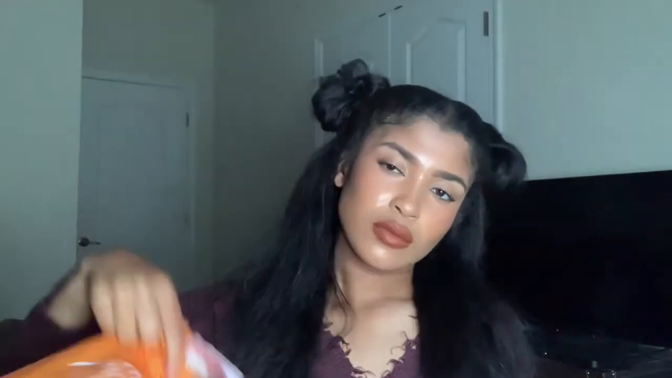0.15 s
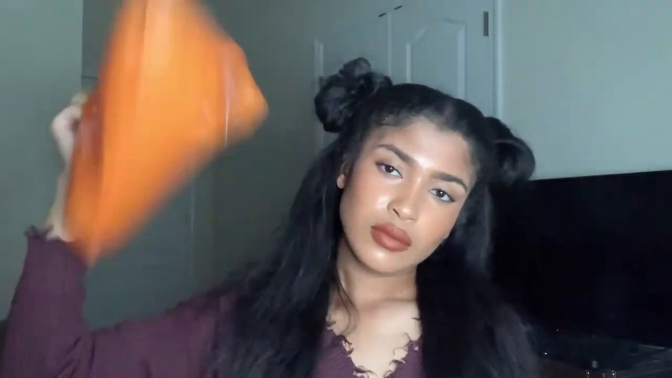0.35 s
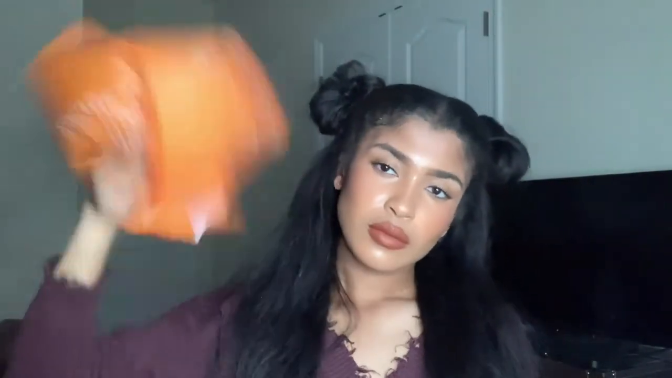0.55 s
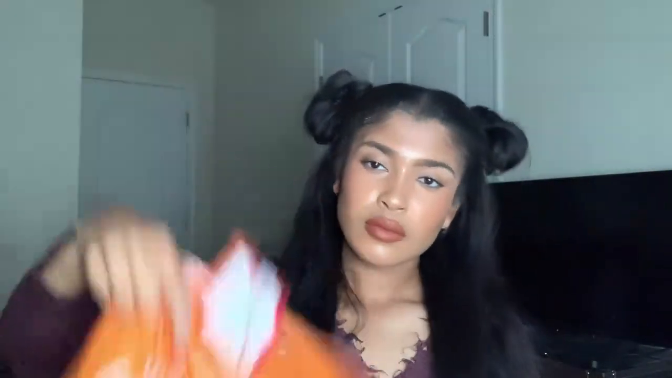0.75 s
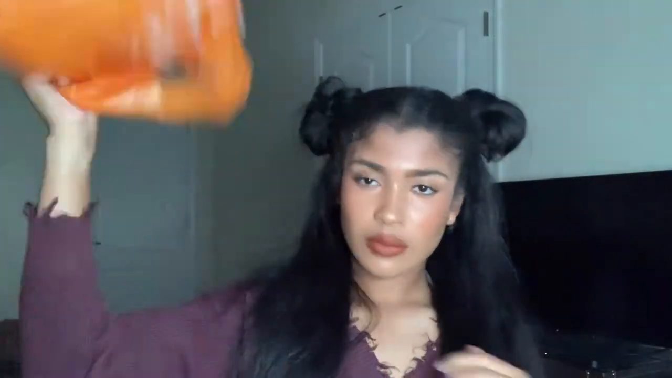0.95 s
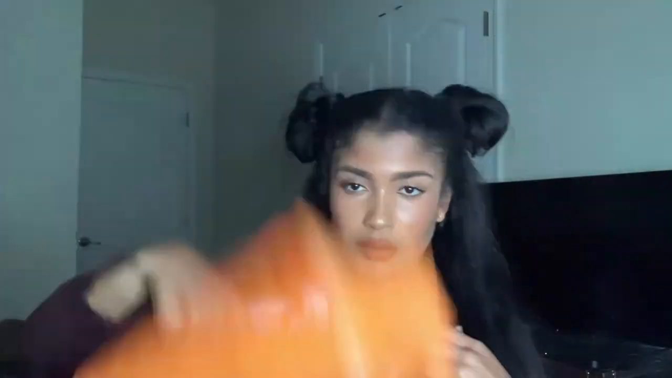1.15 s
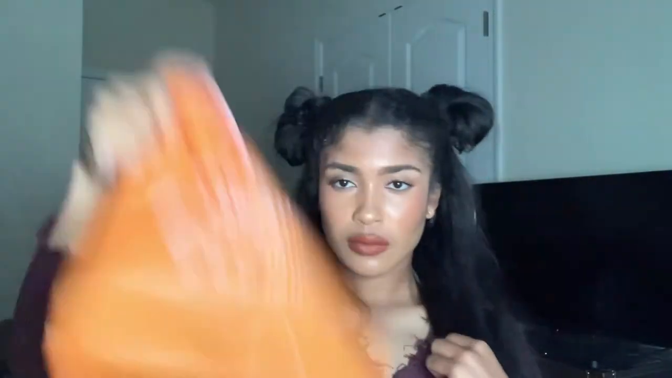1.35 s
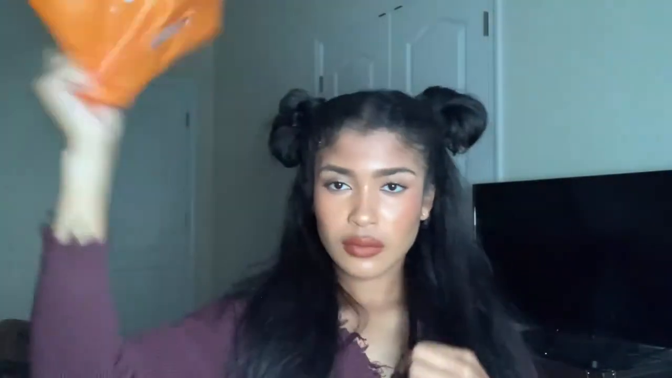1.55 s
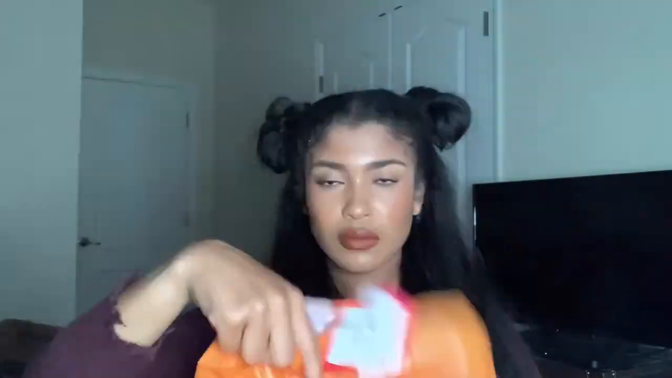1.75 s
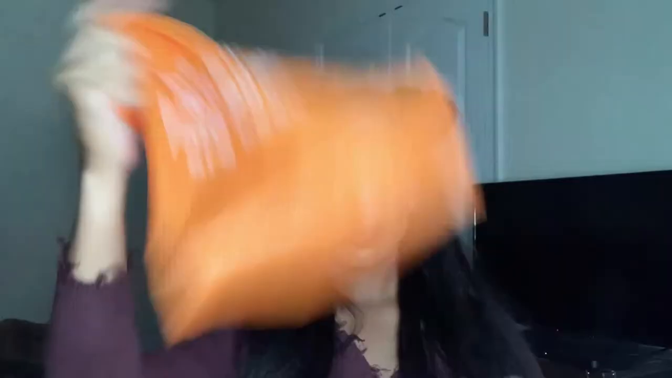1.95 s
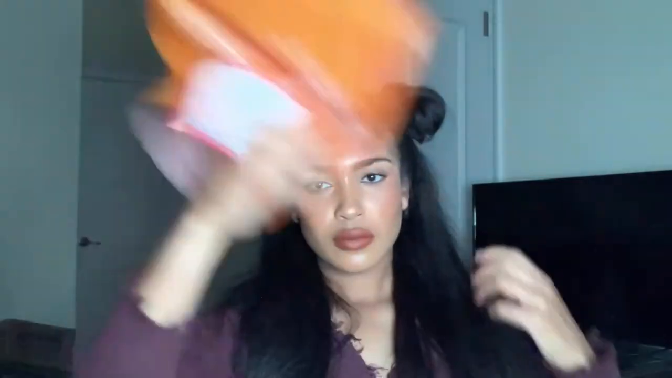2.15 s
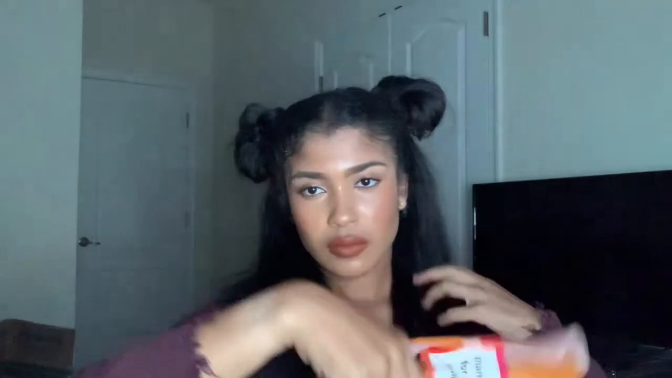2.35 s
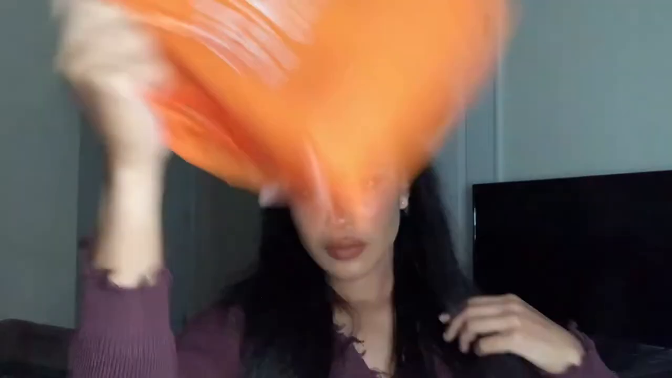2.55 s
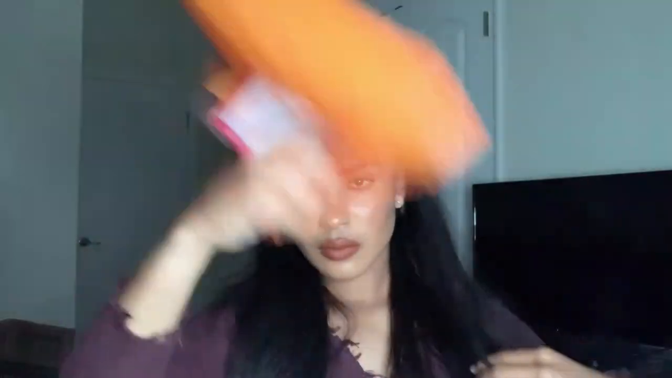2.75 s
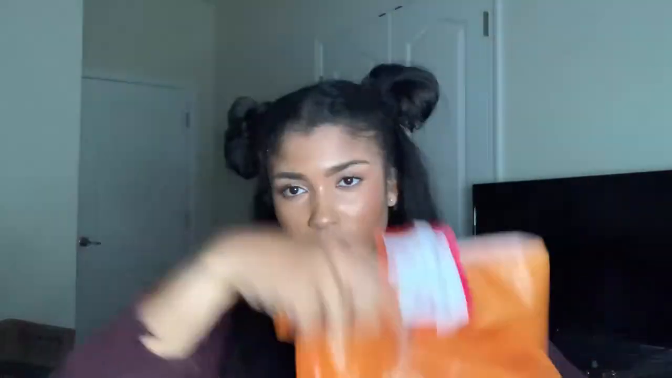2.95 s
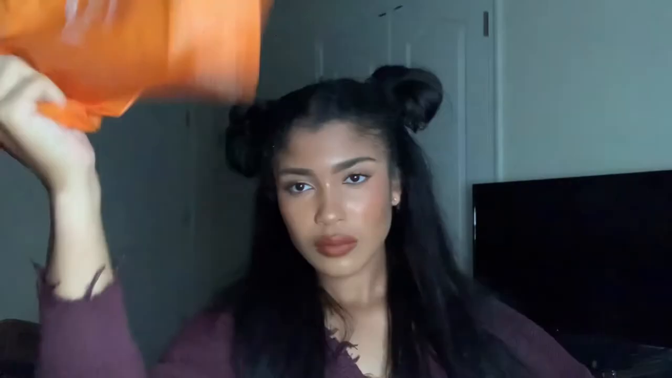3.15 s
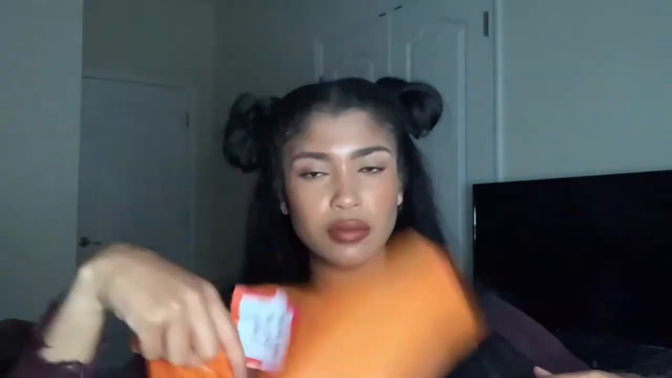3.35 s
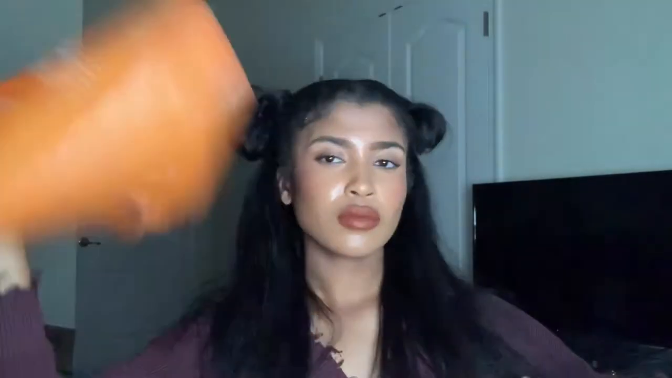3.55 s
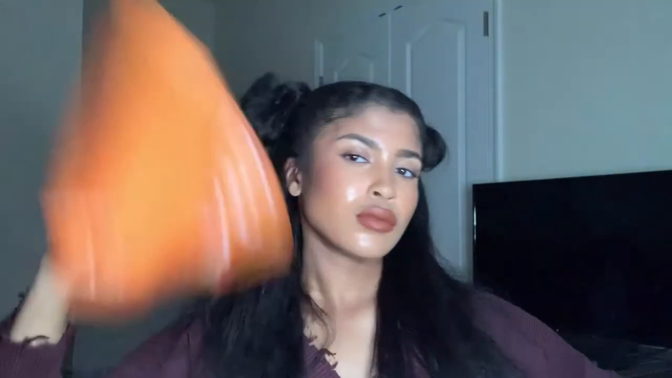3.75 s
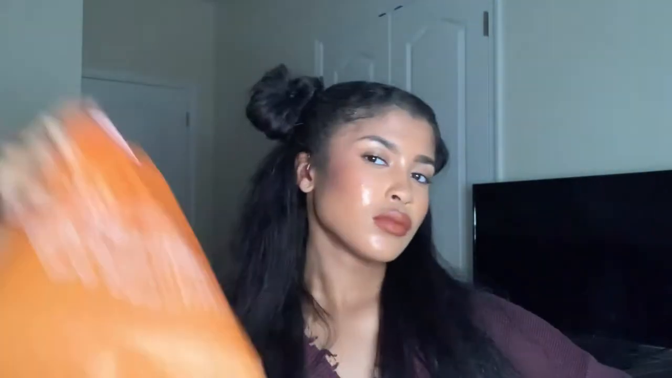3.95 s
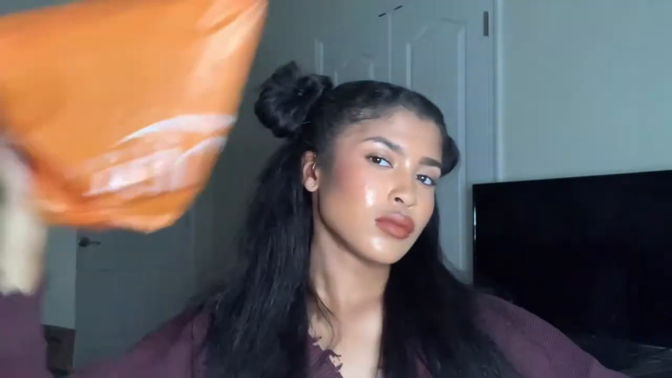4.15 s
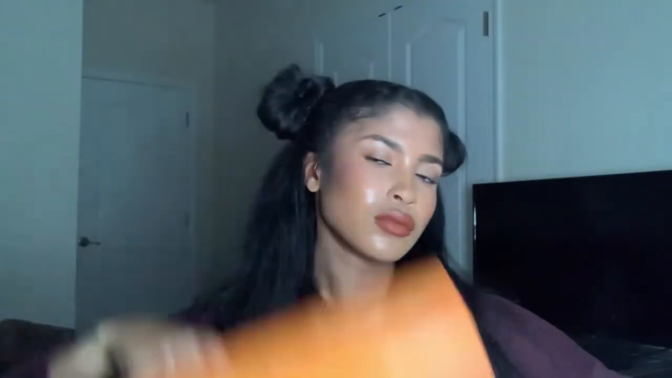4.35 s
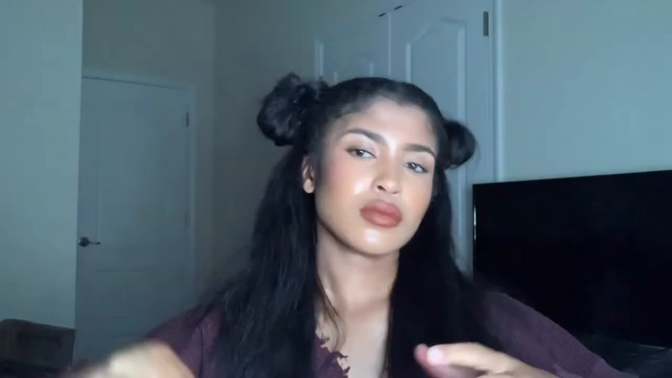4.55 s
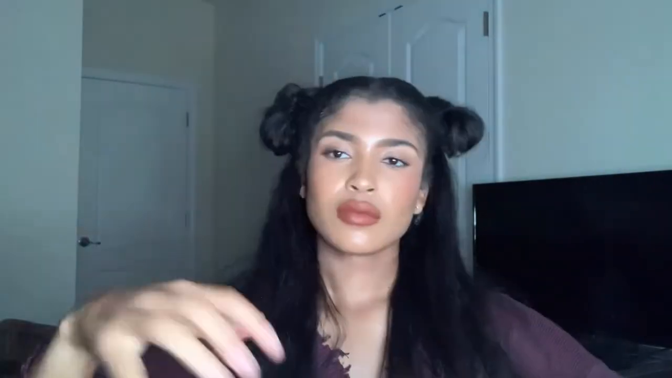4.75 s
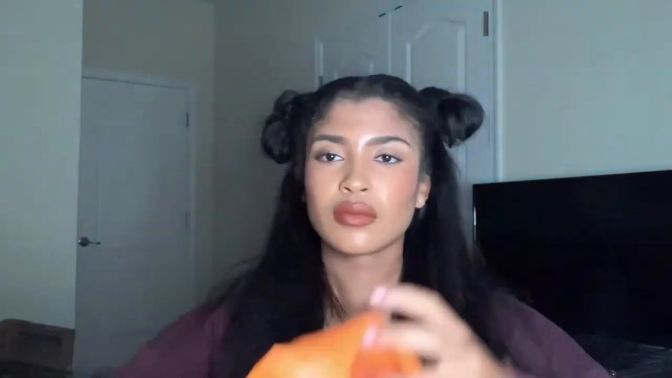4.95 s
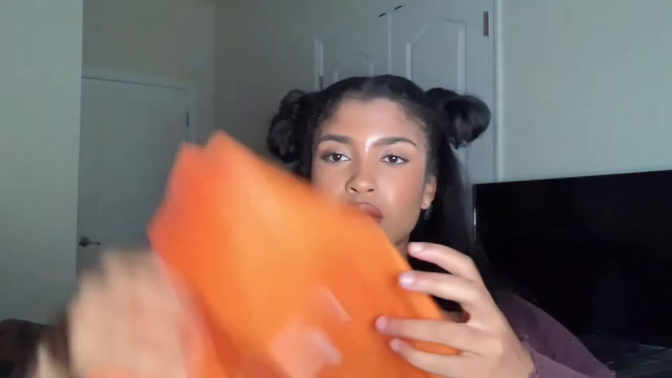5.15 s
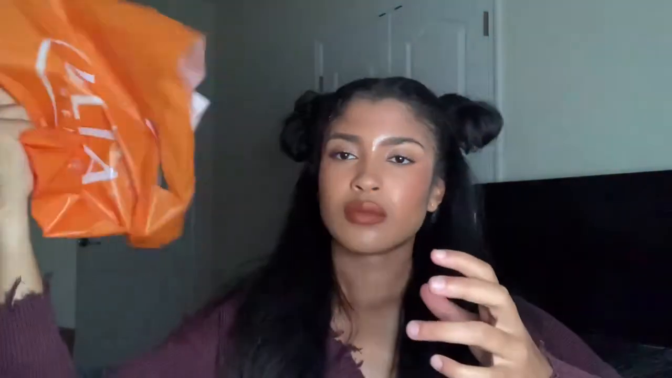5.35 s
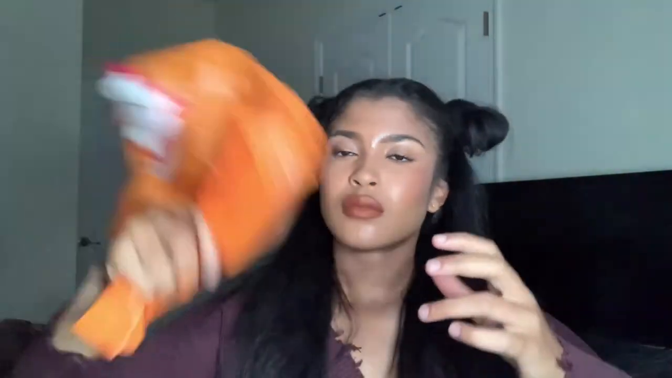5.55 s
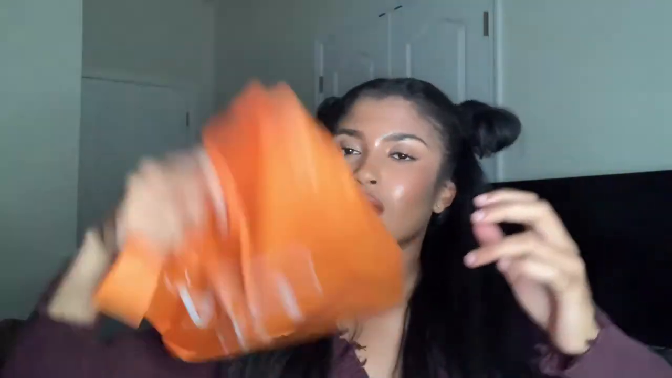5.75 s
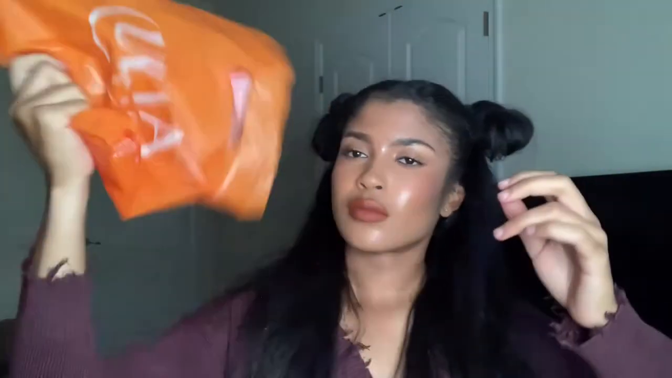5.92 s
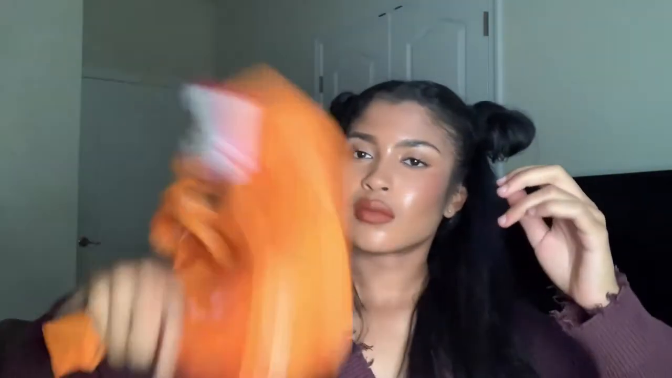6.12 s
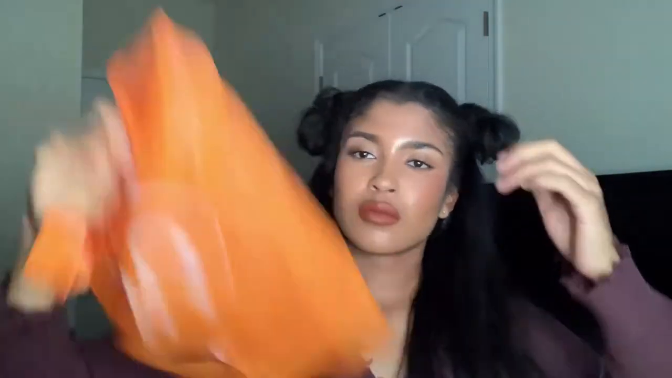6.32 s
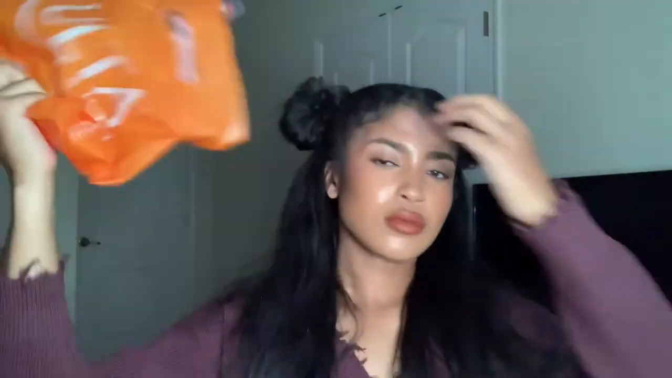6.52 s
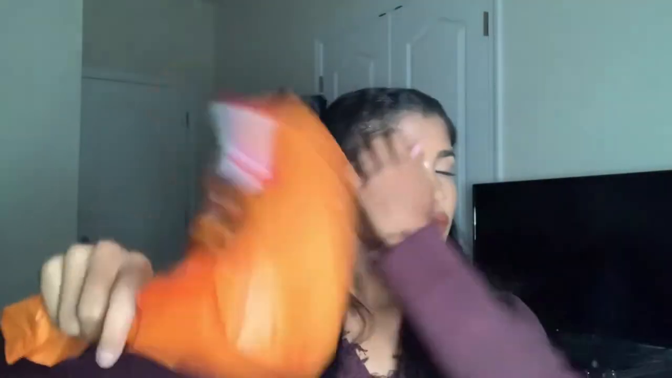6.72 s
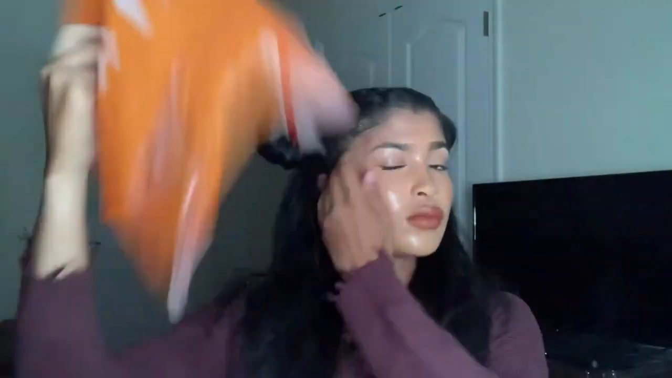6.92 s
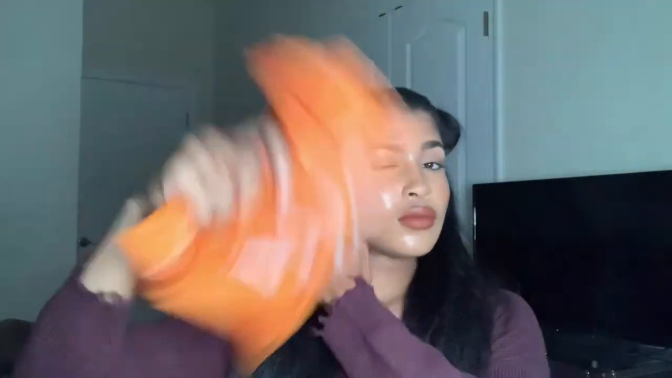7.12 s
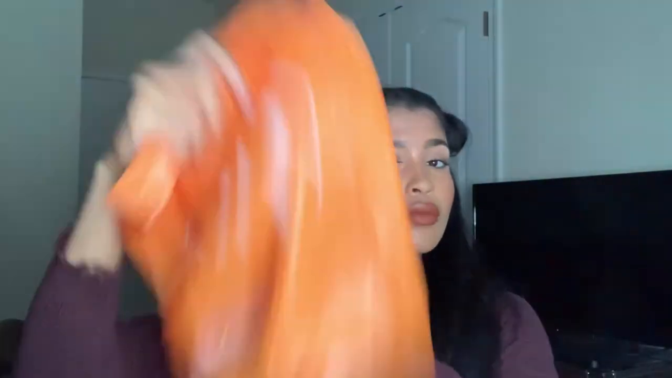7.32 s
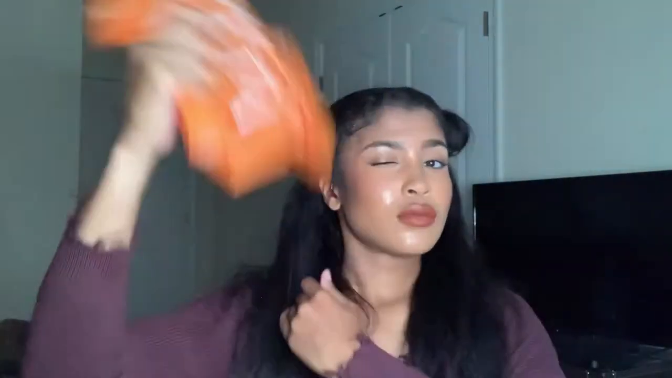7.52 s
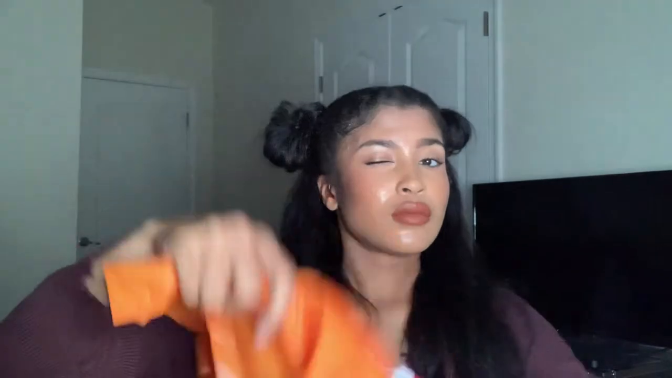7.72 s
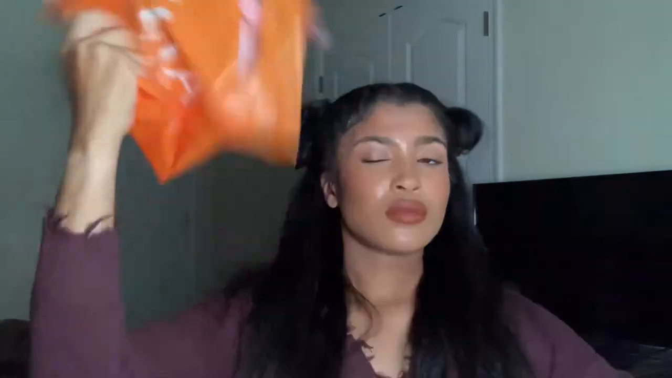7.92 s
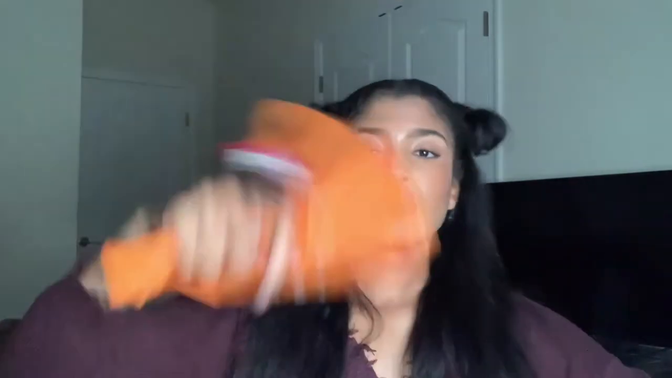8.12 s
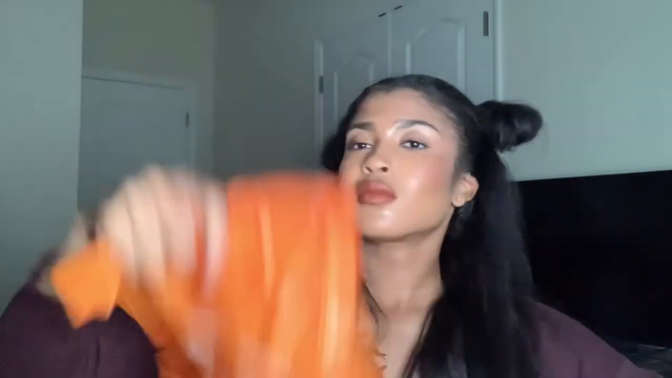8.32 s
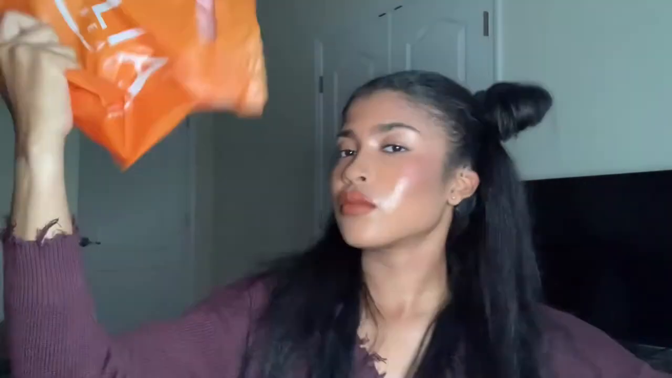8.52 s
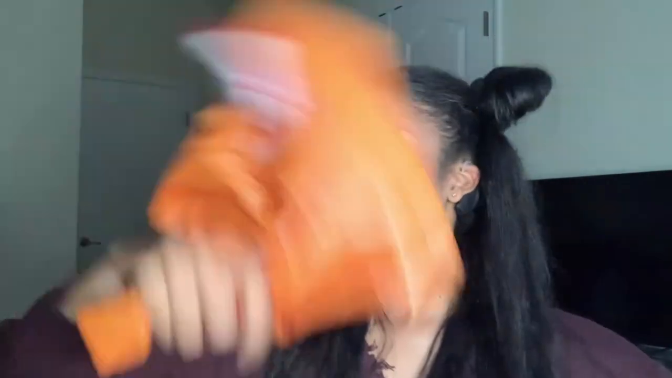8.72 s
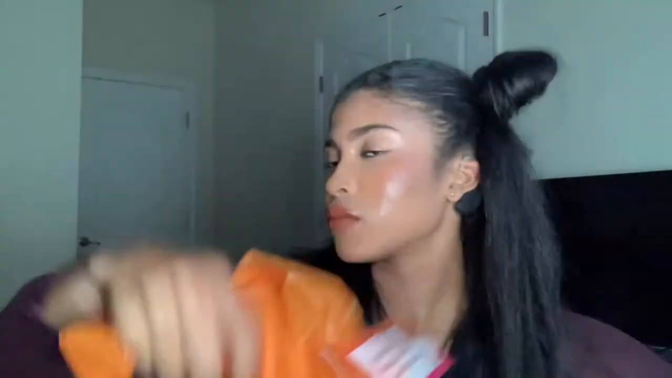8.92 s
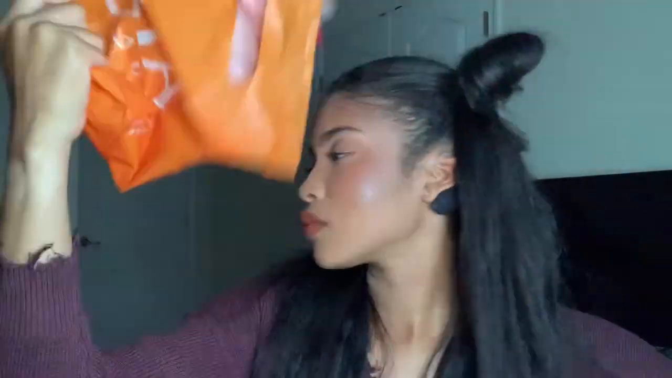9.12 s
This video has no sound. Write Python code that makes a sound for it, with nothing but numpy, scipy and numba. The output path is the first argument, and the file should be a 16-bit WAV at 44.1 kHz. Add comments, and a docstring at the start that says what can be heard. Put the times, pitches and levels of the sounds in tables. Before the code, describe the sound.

A thin plastic bag is waved back and forth close by, crinkling and flapping hard at first, then more gently.

```python
"""In a small room, a thin plastic bag is waved back and forth close by.
With each stroke of the arm, thousands of tiny creases buckle and blend into a dense crackle.
Single folds snap and tick, the sheet pushes soft puffs of air, and the bag thumps as it jerks taut.
The waving is strong for the first half and gentler after that. The room adds a short echo,
and a faint low noise lies under everything. Left and right differ a little, so the sound is wide."""
import sys
import numpy as np
from scipy import signal
from scipy.fft import rfft, irfft, next_fast_len
from scipy.io import wavfile
from scipy.ndimage import uniform_filter1d, map_coordinates
from numba import njit

SR = 44100
rng = np.random.default_rng(int(sys.argv[2]) if len(sys.argv) > 2 else 0)


def log_audio(samples):
    """Write samples as a 16-bit WAV file to the path given in sys.argv[1]."""
    # one column per channel
    frames = np.atleast_2d(samples).T
    # limit to full scale, then quantise
    limited = np.clip(frames, -1, 1)
    pcm = np.round(limited * 32767).astype(np.int16)
    wavfile.write(sys.argv[1], SR, pcm)


N = 409248


def crackle():
    """Dull, hollow and crisp creases buckle together; a harder stroke is louder and more papery."""
    # tone of the crackle: (frequency [Hz], level [dB])
    crackle_tone = [(130, -22.5), (240, -4), (350, 3.5), (520, -2), (700, 0.5), (1000, 0), (1400, 2),
                    (1750, 2), (2300, -3), (3100, -2.5), (3700, -6), (4300, -2.5), (5200, -7.5),
                    (9000, -11.5), (15500, -14)]
    dull = buckles(180.1, 7000, per_s=3000, spread_db=2.0, clump_db=2.0,
                   turns=1.2, damping=0.86, steady_s=0.059, kinds=80)
    hollow = buckles(1099.5, 4200, per_s=220, spread_db=3.5, clump_db=0.0,
                     turns=3.5, damping=0.29, steady_s=0.104, kinds=60)
    crisp = buckles(4600, 14400, per_s=2600, spread_db=2.5, clump_db=2.5,
                    turns=1.0, damping=0.64, steady_s=0.047, kinds=60)
    effort_db, crisp_db = arm()
    sheet = dull + gain_of(-8.0) * hollow
    # the papery middle pitches grow faster with effort than the rest
    papery = signal.lfilter(*signal.butter(1, (800, 2200), "bandpass", fs=SR), sheet)
    sheet = sheet + (gain_of(0.078 * (effort_db + 27.0)) - 1) * papery
    creases = coloured(sheet + gain_of(crisp_db) * crisp, crackle_tone)
    return gain_of(effort_db) * evened(pockets(creases, depth_db=1.54, last_s=.045, octaves=.4))


def arm():
    """The arm's effort and crispness over time, in dB: strokes rise and fall, and overlaps add up."""
    # strokes of the arm; rise and fall times count as at least 0.01 s:
    # (peak time [s], effort [dB], time to rise 20 dB [s], time to fall 20 dB [s], crispness [dB])
    strokes = [(0.033, -24.5, 2.5, 0.09, -1.5), (0.159, -30.5, 0.24, 0.15, 4),
               (0.202, -28.5, 0.03, 0.22, 7.5), (0.511, -19.5, 0.0843, 0.22, 3.5),
               (0.658, -20, 0.0353, 0.069, 6), (0.804, -24.5, 0.17, 0.19, 4.5),
               (1.031, -19, 0.07, 0.15, -0.8), (1.205, -28, 0.1, 0.35, 4), (1.351, -22.5, 0.09, 0.12, -0.5),
               (1.583, -22.5, 0.072, 0.21, 4), (1.799, -24, 0.05, 0.06, 3), (1.904, -25, 0.1, 0.13, 4),
               (2.131, -23.5, 0.12, 0.13, 5), (2.332, -23, 0.04, 0.13, 1.5), (2.46, -30, 0.39, 0.16, 7.5),
               (2.669, -22, 0.07, 0.2, 4.5), (2.912, -24, 0.11, 0.11, -1.5), (2.977, -27.5, 0.1, 0.3, 4),
               (3.223, -18.0, 0.0749, 0.1345, 3.5), (3.415, -20.5, 0.08, 0.18, 3.5),
               (3.709, -17.5, 0.1, 0.1248, 2.5), (3.881, -20.5, 0.06, 0.16, 2.5),
               (3.953, -31.5, 0.3, 0.2, 0), (4.243, -21.5, 0.13, 0.11, 3.5), (4.385, -23, 0.04, 0.142, 2),
               (4.555, -42, 0.8, 0.3, 6), (4.799, -40.5, 0.08, 0.1, 5), (4.975, -44, 0.24, 0.03, 3),
               (5.046, -35, 0.18, 0.03, 6.5), (5.169, -30, 0.14, 0.39, 8), (5.392, -38.5, 0.2, 0.26, -1),
               (5.538, -35.5, 0.3, 0.17, 3.5), (5.608, -36, 0.03, 0.154, 6),
               (5.782, -32.5, 0.18, 0.18, 2.5), (5.965, -34.5, 0.05, 0.15, -11),
               (6.06, -33, 0.18, 0.43, 7.5), (6.321, -33.5, 0.15, 0.14, -0.5), (6.508, -35, 0.2, 0, 3.5),
               (6.602, -31.5, 0.2, -0.06, -1), (6.711, -29.5, 0.21, 0.26, 1.5),
               (6.844, -29, 0.3, 0.144, 6.5), (7.02, -28.5, 0.11, 0.09, 7), (7.193, -30, 0.22, 0.3, 3.5),
               (7.456, -31, 0.08, 0.11, 7), (7.638, -29.5, 0.09, 0.24, 6), (7.865, -34, 0.6, -0.03, 3),
               (7.933, -33, 0.06, 0.28, 9), (8.051, -33.5, -0.04, 0.14, 5.5), (8.167, -31, 0.04, 0.14, 6),
               (8.28, -30.5, 0.03, 0.28, 3.5), (8.51, -34, 0.06, 0.3, 4.5), (8.744, -34, 0.3, 0.2, 6.5),
               (8.912, -33.5, 0.1, 0.26, 3.5), (9.042, -39, 0.6, -1, 5), (9.28, -31, 0.42, 1, 2.5)]
    rounding = 1.337  # above 1 gives a round peak with steep sides
    dulling_db_per_s = -21  # a stroke starts crisp and dulls as it runs out
    rest_db = -58  # the bag hanging still
    peak_s, peak_db, rise_s, fall_s, crisp_db = np.transpose(strokes)[:, :, None]
    t = np.arange(0, N / SR + .002, .002)
    past_peak_s = t - peak_s
    side_s = np.maximum(np.where(past_peak_s < 0, rise_s, fall_s), .01)
    distance = abs(past_peak_s) / side_s + 1e-9
    power = gain_of(peak_db - 20 * distance ** rounding) ** 2 + 1e-30
    stroke_crisp_db = crisp_db + dulling_db_per_s * np.clip(past_peak_s, -.2, .2)
    crispness = (power * stroke_crisp_db).sum(0) / power.sum(0)
    effort = 10 * np.log10(power.sum(0) + gain_of(rest_db) ** 2)
    return [np.interp(np.arange(N) / SR, t, curve) for curve in (effort, crispness)]


def buckles(low_hz, high_hz, per_s, spread_db, clump_db, turns, damping, steady_s, kinds):
    """Creases give way at random, few of them large; each kind rings briefly at its own pitch."""
    clumps = evened(uniform_filter1d(uniform_filter1d(rng.standard_normal(N), 300), 300))
    size = gain_of(spread_db * np.minimum(rng.exponential(1, N), 4) + clump_db * clumps)
    starts = np.flatnonzero(rng.random(N) < per_s / SR)
    kind = rng.integers(0, kinds, N)[starts]
    out = np.zeros((2, N))
    for k, hz in enumerate(np.geomspace(low_hz, high_hz, kinds)):
        ring_s = .0002 + turns / hz
        click = burst(hz, damping * hz, ring_s, ring_s)
        click *= np.sqrt(hz) / np.linalg.norm(click, axis=1, keepdims=True)
        at = starts[kind == k]
        out += scatter(N, at, size[at], click)
    # the hand feeds in power evenly over steady_s
    power = uniform_filter1d((out ** 2).mean(0), round(steady_s * SR))
    return out / np.sqrt(abs(power) + .01 * power.mean())


def pockets(sound, depth_db, last_s, octaves):
    """Pockets of the bag open and close, so patches of high and low pitch swell and sink."""
    hz, t, spectrum = signal.stft(sound, SR, nperseg=512)
    grid = np.meshgrid(np.log2(hz + 100) / octaves, t / last_s, indexing="ij")
    patches = evened(map_coordinates(rng.standard_normal((100, 1000)), grid, order=3, mode="wrap"))
    return signal.istft(spectrum * gain_of(depth_db * patches), SR, nperseg=512)[1][:, :N]


def snaps():
    """A fold snaps with a crack, a short ring and a slower low flap; a thin crease only ticks."""
    # folds that snap:
    # (peak time [s], relative level [dB], ring pitch [Hz], flap boost [dB], rough half length [s])
    folds = [(0.149, -20.5, 1500, -4.5, 0.0039), (0.474, -16, 1490, -8, 0.0033),
             (0.527, -19, 1630, -9, 0.013), (0.538, -22, 1660, -11, 0.0055),
             (0.654, -17.5, 1500, 5, 0.0056), (1.027, -15, 4200, -3, 0.0065),
             (1.075, -17, 1440, -22, 0.0018), (1.086, -18, 1560, -8, 0.002),
             (1.2042, -22, 6120, 3.5, 0.0045), (1.348, -5.5, 1540, -12.5, 0.0022),
             (1.565, -20, 1350, -2.5, 0.0042), (1.614, -17, 1930, -3.5, 0.0036),
             (1.787, -15, 7100, -3.5, 0.0027), (1.884, -21, 5880, -8.5, 0.0036),
             (1.914, -5, 4220, -31, 0.0011), (2.123, -19, 2630, -11.5, 0.01),
             (2.078, -22, 3000, -18.5, 0.0029), (2.203, -19, 4900, -22, 0.0014),
             (2.321, -13.5, 2470, -5, 0.0017), (2.335, -24, 3570, 3.5, 0.0059),
             (2.634, -26, 3500, -11, 0.0039), (2.702, -15.5, 1810, -12.5, 0.0066),
             (2.719, -21, 1350, -6, 0.018), (2.9065, -22, 1510, 1, 0.011),
             (2.9866, -19.5, 1950, -5, 0.0059), (3.0165, -19, 3180, -3.5, 0.0014),
             (3.021, -24, 4000, -6, 0.0028), (3.167, -19.5, 3980, -12, 0.0023),
             (3.201, -17.5, 2500, -17, 0.0026), (3.213, -14, 1290, -31, 0.0053),
             (3.425, -19, 1760, -6, 0.013), (3.493, -25, 2700, -7, 0.0046), (3.678, -16, 3970, -20, 0.0042),
             (3.695, -9, 1400, -16, 0.0061), (3.714, -5, 2580, -6.5, 0.0029),
             (3.883, -22.5, 2820, -1, 0.01), (3.958, -19, 1440, -10, 0.0037),
             (4.125, -23, 2980, -12.5, 0.0019), (4.153, -19, 2760, -15, 0.0043),
             (4.225, -14, 1320, -14.5, 0.0048), (4.24, -12, 1920, -7.5, 0.0053),
             (4.256, -15, 1400, -10, 0.0038), (4.367, -13.5, 1960, -4.5, 0.0022),
             (4.625, -33, 3200, -5.5, 0.0014), (4.812, -33, 4500, -13, 0.002),
             (4.9, -28.5, 4590, -11, 0.0017), (4.971, -32.5, 2000, -1.5, 0.0028),
             (5.012, -30, 5000, -9, 0.0015), (5.028, -19.5, 5060, -10.5, 0.0029),
             (5.129, -19, 1700, -13, 0.0022), (5.157, -21, 2650, -11, 0.0026),
             (5.299, -21, 1540, -26, 0.0019), (5.389, -20, 1450, -29, 0.0013),
             (5.764, -22.5, 1800, -13, 0.0023), (5.798, -24.5, 1560, -27, 0.0071),
             (5.954, -26, 1590, -8.5, 0.0032), (6.308, -18.5, 1590, -14.5, 0.0031),
             (6.374, -26.5, 4160, -3.5, 0.0032), (6.621, -20, 4050, -13, 0.0028),
             (6.693, -20, 2560, -23, 0.0018), (6.769, -24, 4090, -4, 0.0042),
             (6.835, -20.5, 1660, -23, 0.0026), (6.959, -20, 3360, -19, 0.0018),
             (7.0065, -23.5, 1520, -24, 0.0078), (7.194, -20, 2820, -14.5, 0.0019),
             (7.258, -22.5, 6140, -10.5, 0.0023), (7.2944, -17.5, 2800, -16.5, 0.0016),
             (7.3755, -20, 4000, -27, 0.0016), (7.38, -22, 2500, -21, 0.00091),
             (7.441, -25, 4200, -23, 0.0015), (7.457, -19.5, 4440, -28, 0.004),
             (7.596, -19, 4000, -16, 0.0016), (7.634, -22, 1840, -8, 0.0051),
             (7.655, -21, 2100, -17, 0.0019), (7.702, -20, 1850, -7, 0.0035),
             (7.928, -24, 4000, -24, 0.0025), (7.945, -25, 3360, -24, 0.0036),
             (8.259, -20.5, 6640, -13.5, 0.0023), (8.689, -23, 3010, -25.5, 0.0024),
             (8.811, -26, 6070, -1, 0.0024), (8.903, -26, 1710, -12, 0.0053),
             (9.041, -23.5, 4010, -33, 0.0023)]
    # thin creases that tick: (time [s], relative level [dB])
    ticks = [(0.657, -11.5), (0.7597, -18.5), (0.778, -20.5), (0.865, -31), (1.2127, -15.5),
             (1.2575, -22.5), (1.349, -14), (1.4257, -31), (1.572, -20), (1.6132, -13.5), (1.7888, -21),
             (1.8857, -21), (1.935, -21.5), (2.013, -26.5), (2.1444, -25), (2.1997, -23.5), (2.3247, -13),
             (3.016, -14.5), (3.023, -19), (3.1546, -27.5), (3.2805, -21.5), (3.852, -27), (3.923, -21),
             (4.206, -16), (4.3672, -22), (4.805, -32), (5.131, -23), (5.166, -20), (5.377, -23.5),
             (5.512, -24.5), (5.7632, -20.5), (5.8, -27), (5.821, -31), (5.8414, -26.5), (5.972, -29),
             (6.0565, -27), (6.1458, -25), (6.306, -26), (6.325, -29), (6.3418, -23), (6.347, -27),
             (6.563, -29), (6.5856, -21), (6.655, -24), (6.703, -21), (6.7665, -19), (6.849, -25.5),
             (6.8945, -19.5), (6.962, -22.5), (7.119, -21.5), (7.165, -26), (7.2616, -21.5), (7.408, -24),
             (7.521, -32), (7.6084, -22), (7.658, -20), (7.833, -28), (7.9667, -27.5), (8.042, -25.5),
             (8.2072, -25.5), (8.439, -31.5), (8.548, -25), (8.623, -28.5), (8.7947, -25.5), (8.811, -20.5),
             (8.908, -24), (8.949, -21.5), (9.0224, -27), (9.073, -26.5)]
    out = np.zeros((2, N + SR))
    for peak_s, db, hz, flap_db, half_s in folds:
        rise_s, decay_s = 0.45 * half_s, 1.2 * half_s
        crack = gain_of(db - 5.5) * burst(1700, 7300, decay_s, rise_s)
        ring = gain_of(db - 4.5) * burst(hz, 0.25 * hz, decay_s, rise_s)
        flap = gain_of(db + flap_db - 1.5) * burst(246, 530, decay_s + .003, rise_s + .0028)
        for part in (crack, ring, flap):
            add(out, peak_s - rise_s, part)
    for start_s, db in ticks:
        add(out, start_s, gain_of(db + 5.5) * burst(8000, 7500, decay_s=.0007, rise_s=.0006))
    return out[:, :N]


def air_puffs():
    """Broad panels of the sheet bend and push low puffs of air, more with a harder stroke."""
    # tone of the pushed air: (frequency [Hz], level [dB])
    air_tone = [(24, -33), (50, -9.5), (80, -10), (110, -2.5), (165, -9.5), (260, -7.5)]
    # air pushed at an effort of -30 dB, more while the swing is wide: (time [s], level [dB])
    push = [(0.0, -46), (2.3, -44.5), (5.2, -47), (9.28, -48)]
    panels = buckles(40, 231.9, per_s=150, spread_db=3.0, clump_db=1.5,
                     turns=.6, damping=0.48, steady_s=0.062, kinds=20)
    effort_db, _ = arm()
    push_db = np.interp(np.arange(N) / SR, *np.transpose(push))
    return gain_of(push_db + 0.76 * (effort_db + 30)) * evened(coloured(panels, air_tone))


def thumps():
    """The open bag catches air and jerks taut: one short, low boom whose pitch sinks."""
    # catches of air: (start time [s], peak level [dB], starting pitch [Hz])
    catches = [(.473, -38, 110), (0.646, -28.5, 68), (1.02, -34, 71), (1.213, -28.5, 119),
               (1.333, -28.5, 99), (1.552, -35.5, 86), (1.78, -32, 98), (2.316, -21.5, 115),
               (2.706, -26.5, 190), (2.888, -30.5, 113), (3.4, -36, 115), (3.695, -29, 111.4),
               (4.24, -32, 113), (4.383, -28.5, 112), (8.794, -43, 86)]
    out = np.zeros((2, N + SR))
    t = np.arange(SR // 5) / SR
    shape = swell_and_fade(t, rise_s=0.022, decay_s=0.012)
    for (start_s, db, hz), phase in zip(catches, rng.random((len(catches), 2, 1))):
        cycles = hz * t * (1 - 1.05 * t)  # the vibration slows down
        add(out, start_s, gain_of(db) * shape * np.sin(2 * np.pi * (cycles + phase)))
    return out[:, :N]


def room_echo(sound, count):
    """The walls return short tails of sound; the moving bag feeds one tail after another."""
    # how long the room rings: (frequency [Hz], time to fade 60 dB [s])
    fade_times = [(100, 0.26), (1000, 0.12), (5000, 0.08), (15000, 0.12)]
    hz, t, spectrum = signal.stft(rng.standard_normal((count, 2, SR // 4)), SR, nperseg=256)
    fade = gain_of(-60 * t / at_frequency(fade_times, hz)[:, None])
    tails = signal.istft(spectrum * fade, SR, nperseg=256)[1]
    tails[..., :round(.004 * SR)] = 0  # silent until the nearest wall answers
    tails_passed = 9.0 * np.arange(N) / SR
    out = np.zeros((2, N))
    for k, tail in enumerate(tails):
        away = np.clip((tails_passed - k + count / 2) % count - count / 2, -1, 1)
        share = sound * np.cos(np.pi / 2 * away)
        out += signal.oaconvolve(share, tail / np.linalg.norm(tail[0]), axes=1)[:, :N]
    return out


def background():
    """Faint, steady noise, mostly low in pitch."""
    # tone of the background: (frequency [Hz], level [dB])
    background_tone = [(20, -33), (40, 0.5), (180, -17), (800, -19), (2000, -31), (15000, -35)]
    return gain_of(-55) * evened(coloured(rng.standard_normal((2, N)), background_tone))


def burst(hz, width_hz, decay_s, rise_s):
    """A short burst of noise around one pitch, different in each of the two channels."""
    t = np.arange(round((rise_s + 7 * decay_s) * SR) + 16) / SR
    radius = np.exp(-np.pi * width_hz / SR)  # closer to 1 gives a clearer pitch
    feedback = [1, -2 * radius * np.cos(2 * np.pi * hz / SR), radius * radius]
    noise = evened(signal.lfilter([1, 0, -1], feedback, rng.standard_normal((2, SR // 8))))
    shape = swell_and_fade(t, rise_s, decay_s)[:SR // 8]
    sound = noise[:, -len(t):] * shape
    return sound * np.linalg.norm(shape) / np.linalg.norm(sound, axis=1, keepdims=True)


def swell_and_fade(t, rise_s, decay_s):
    """A loudness curve that rises smoothly to 1, then dies away."""
    swell = np.sin(np.pi / 2 * np.minimum(t / rise_s, 1)) ** 2
    return swell * np.exp(-np.maximum(t - rise_s, 0) / decay_s)


@njit
def scatter(length, at, size, click):
    """Places a copy of the click at each given sample, each with its own size."""
    out = np.zeros((2, length + click.shape[1]))
    for i in range(len(at)):
        for j in range(click.shape[1]):
            out[0, at[i] + j] += size[i] * click[0, j]
            out[1, at[i] + j] += size[i] * click[1, j]
    return out[:, :length]


def add(mix, start_s, sound):
    """Mixes a sound in at the given time."""
    mix[:, max(round(start_s * SR), 0):][:, :sound.shape[1]] += sound


def coloured(sound, tone):
    """Shapes lows and highs to follow a tone table; the filter rings only after a click, not before."""
    hz = abs(np.fft.fftfreq(8192, 1 / SR))
    log_gain = np.log(gain_of(at_frequency(tone, hz)))
    response = np.exp(np.conj(signal.hilbert(log_gain)))
    taps = np.fft.ifft(response).real[:4096]
    return signal.oaconvolve(sound, taps[None], axes=1)[:, :N]


def at_frequency(rows, hz, column=1):
    """Looks up a table column at any frequency, gliding between the rows."""
    table = np.transpose(rows)
    return np.interp(np.log(hz + 1), np.log(table[0] + 1), table[column])


def gain_of(db):
    """Turns decibels into a number to multiply by."""
    return 10 ** (np.asarray(db) / 20)


def evened(sound):
    """Scales a sound so that its average power is 1."""
    return sound / np.sqrt(np.mean(sound ** 2) + 1e-20)


def scene():
    """The bag, its echo and the quiet background, in two channels."""
    bag = crackle() + air_puffs() + snaps() + thumps()
    return bag + background() + gain_of(-8.5) * room_echo(bag, count=5)


def record(dry):
    """Left and right are partly alike and out of step, differently at each pitch, widening the sound."""
    # how the left and right channels compare:
    # (frequency [Hz], likeness [0-1], left's phase lead [radians], left over right [dB])
    stereo_image = [(40, .8, 0, -.5), (240, .55, -.6, 2), (340, .8, -.2, 0), (600, .55, -.2, 0),
                    (780, .4, 2, 0), (900, .1, 3, 0), (1100, .7, 4.9, -2.5), (1750, .7, 6.5, -2.5),
                    (2300, .1, 6.2, 0), (2800, .45, 5.6, -1), (3900, .4, 6.8, 0), (4800, .1, 9.4, 0),
                    (6200, .4, 7.5, .5), (7500, .78, 8.9, 0), (8400, .985, 9.4, 0), (9500, .985, 9.45, 0),
                    (10300, .8, 9.8, 0), (11500, .6, 11.2, 0), (12400, .85, 12.3, 0),
                    (13300, .97, 12.55, 0), (15200, .9, 12.7, 0)]
    size = next_fast_len(N + 4096)
    hz = np.fft.rfftfreq(size, 1 / SR)
    left, other = rfft(dry, size)
    likeness, lead, balance_db = (at_frequency(stereo_image, hz, column=k) for k in (1, 2, 3))
    right = np.exp(-1j * lead) * (likeness * left + np.sqrt(1 - likeness ** 2) * other)
    balance = gain_of(balance_db / 2)
    pair = irfft([left * balance, right / balance], size)[:, :N]
    pair = pair / (1 + abs(pair / .95) ** 4) ** .25  # rounds off the loudest peaks
    treble_cut = signal.firwin(511, cutoff=15850, window=("kaiser", 9), fs=SR)
    return signal.oaconvolve(pair, treble_cut[None], "same")


dry = scene()
out = record(dry)
log_audio(out)
```